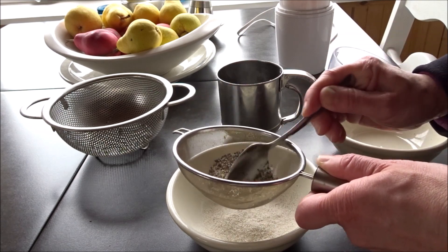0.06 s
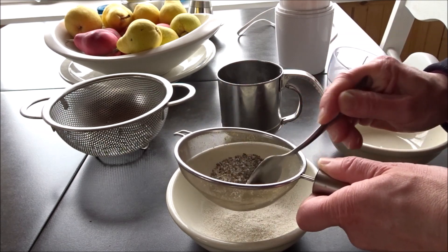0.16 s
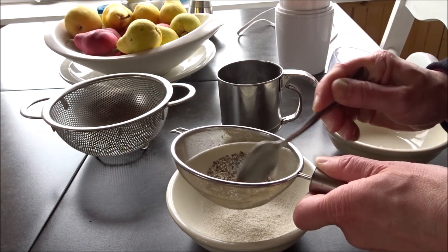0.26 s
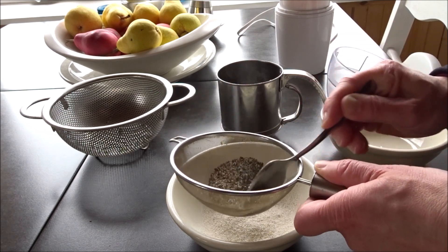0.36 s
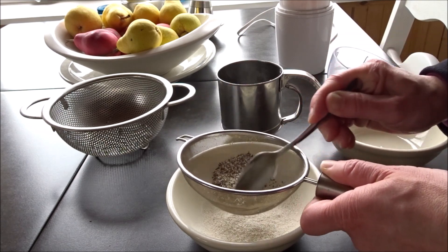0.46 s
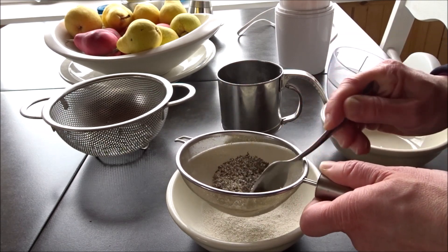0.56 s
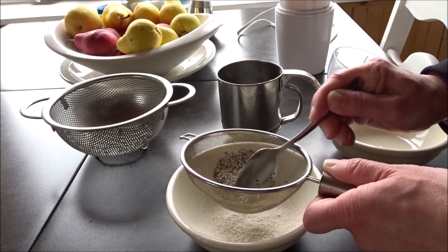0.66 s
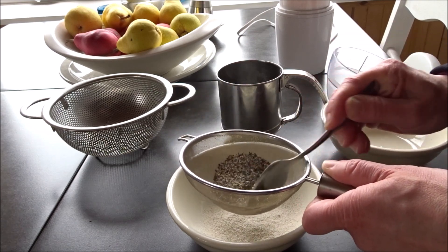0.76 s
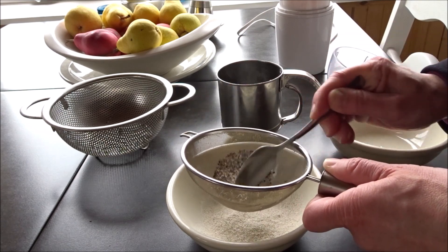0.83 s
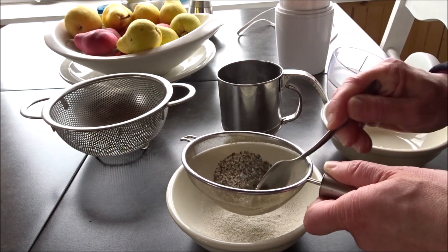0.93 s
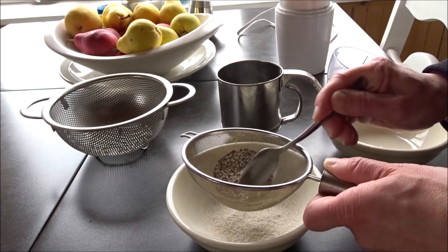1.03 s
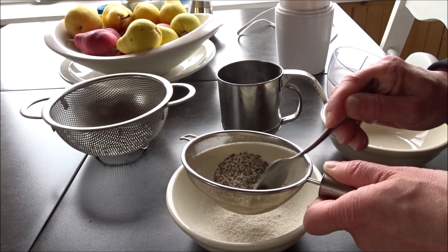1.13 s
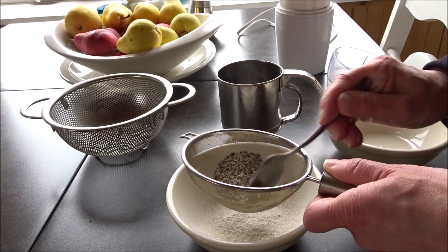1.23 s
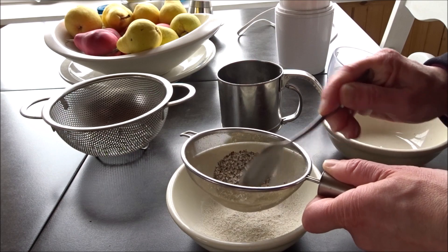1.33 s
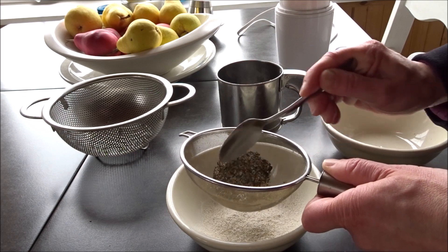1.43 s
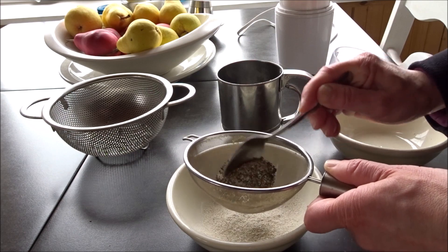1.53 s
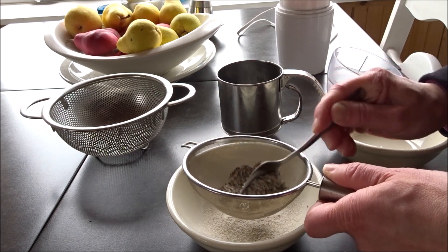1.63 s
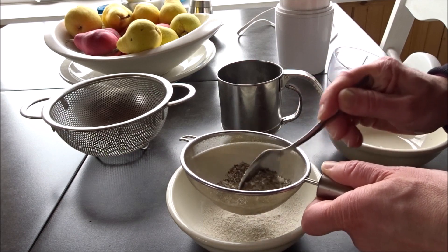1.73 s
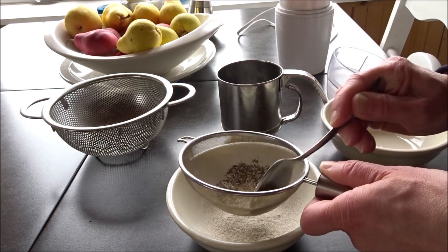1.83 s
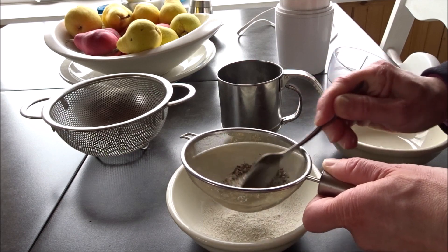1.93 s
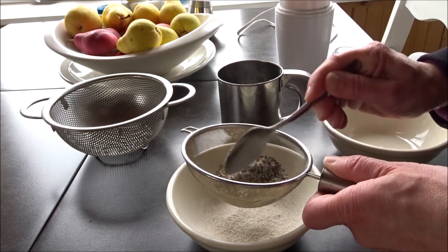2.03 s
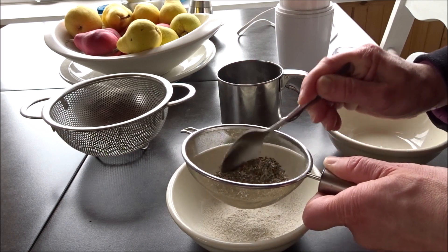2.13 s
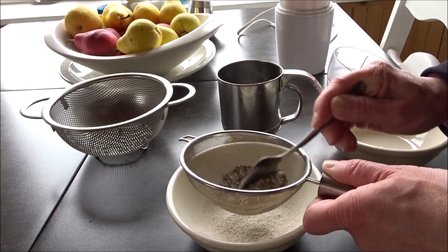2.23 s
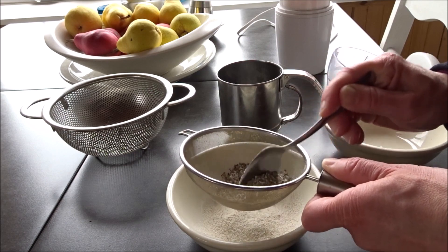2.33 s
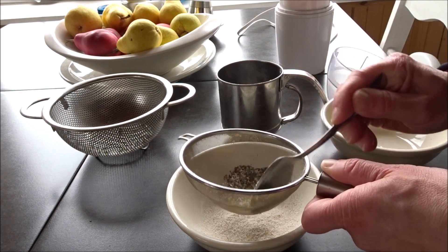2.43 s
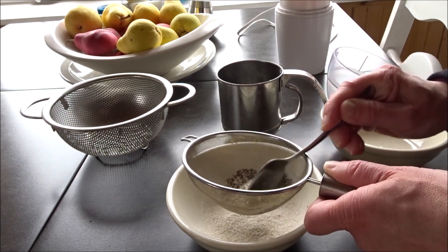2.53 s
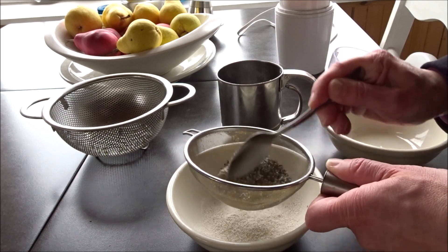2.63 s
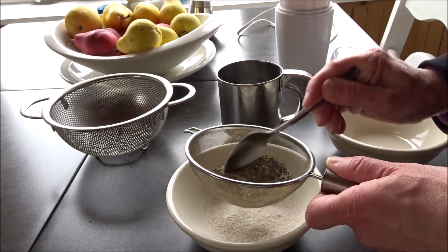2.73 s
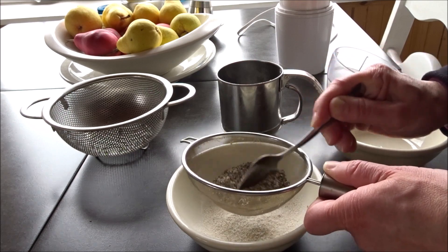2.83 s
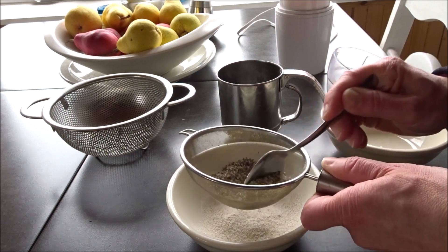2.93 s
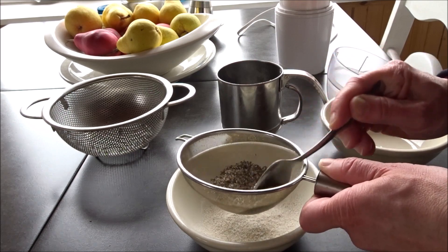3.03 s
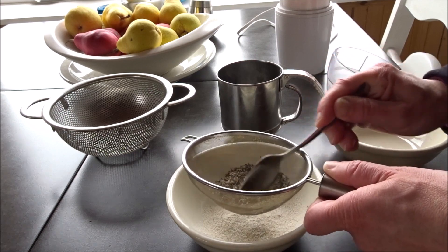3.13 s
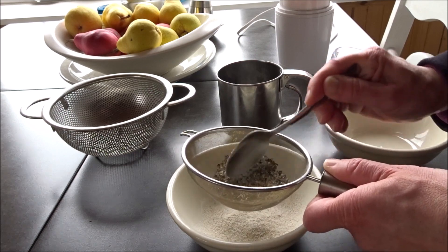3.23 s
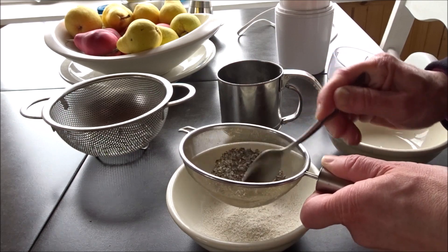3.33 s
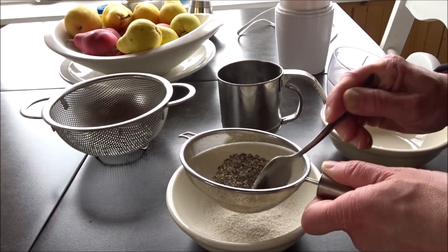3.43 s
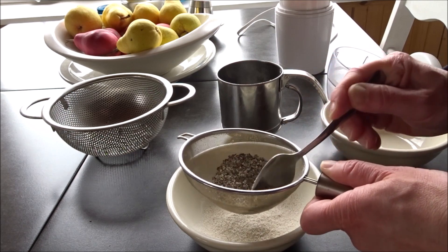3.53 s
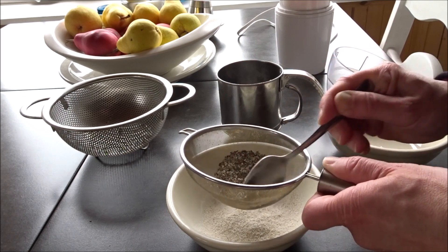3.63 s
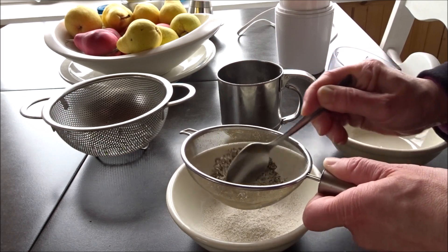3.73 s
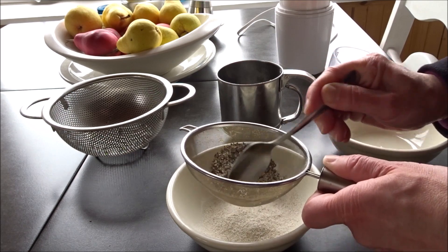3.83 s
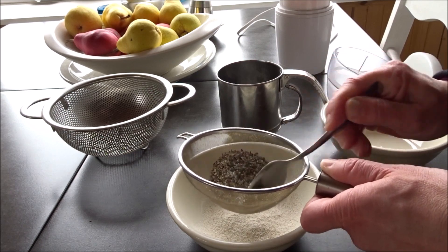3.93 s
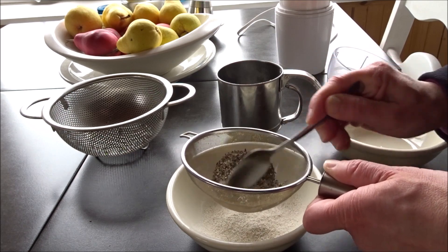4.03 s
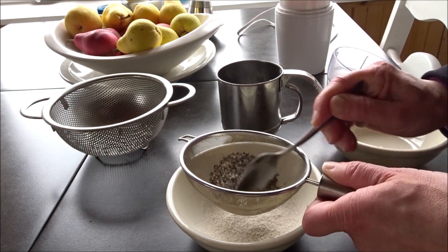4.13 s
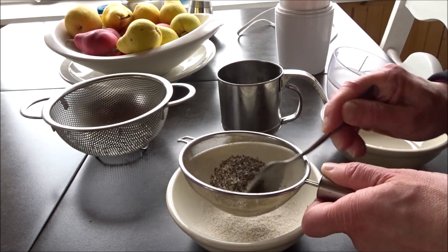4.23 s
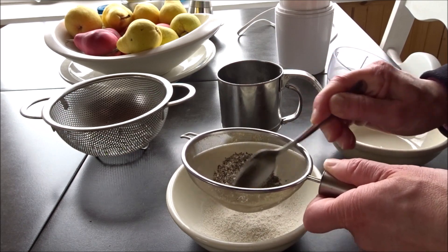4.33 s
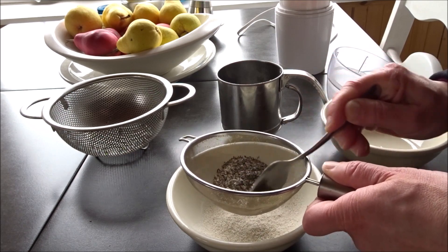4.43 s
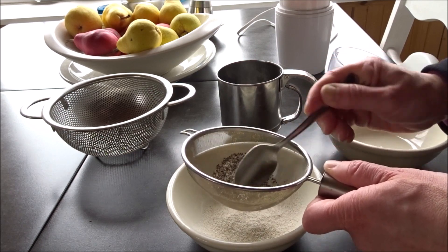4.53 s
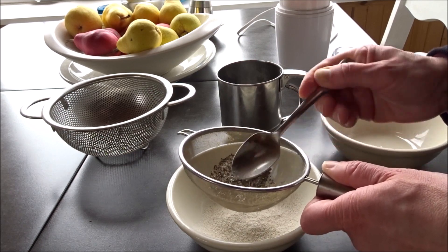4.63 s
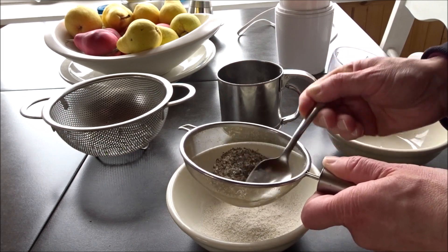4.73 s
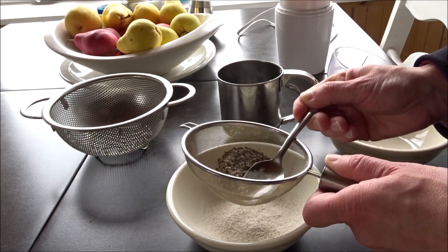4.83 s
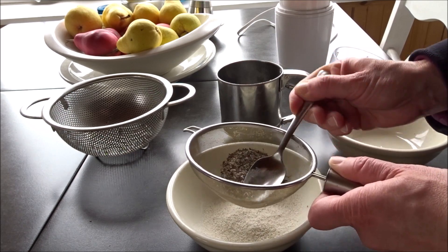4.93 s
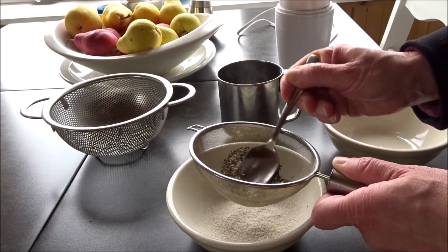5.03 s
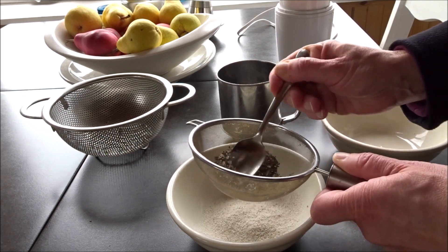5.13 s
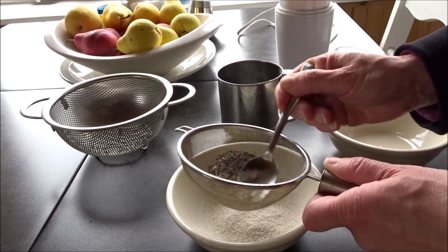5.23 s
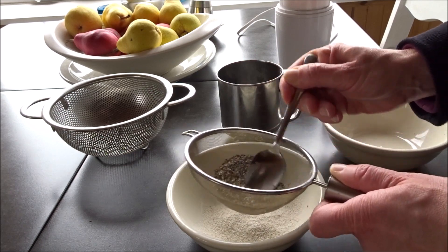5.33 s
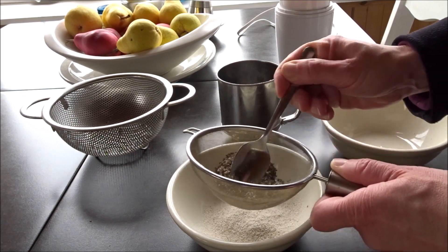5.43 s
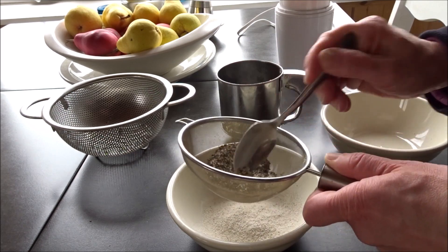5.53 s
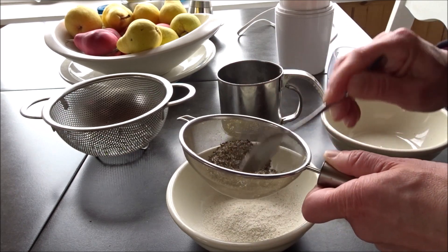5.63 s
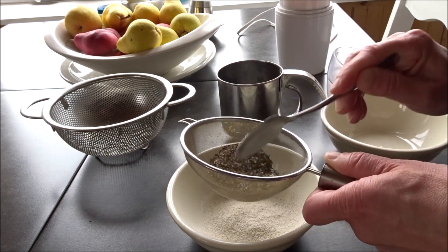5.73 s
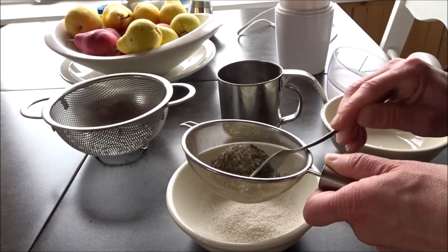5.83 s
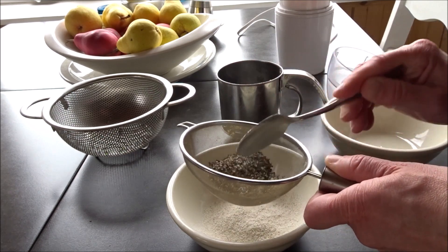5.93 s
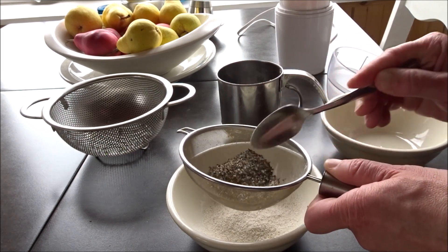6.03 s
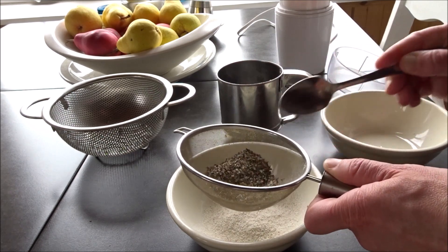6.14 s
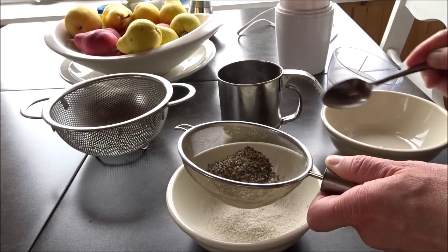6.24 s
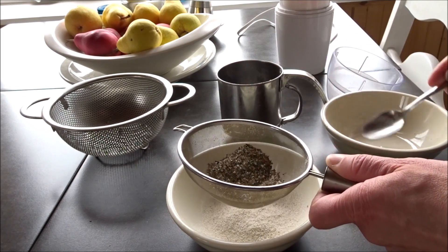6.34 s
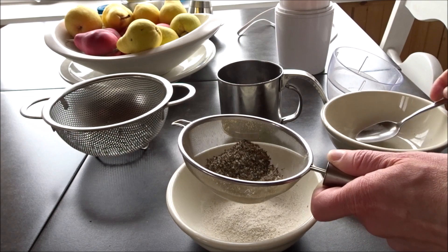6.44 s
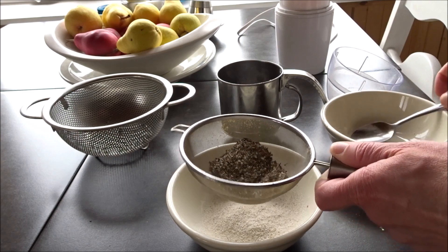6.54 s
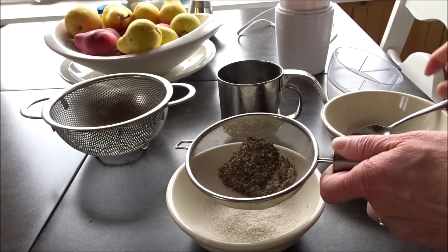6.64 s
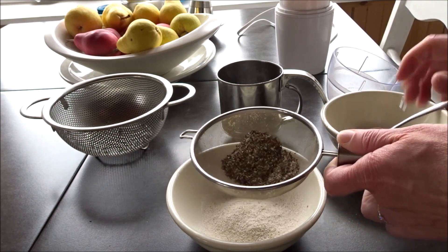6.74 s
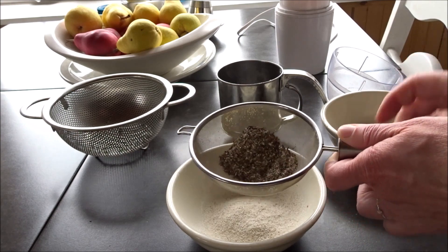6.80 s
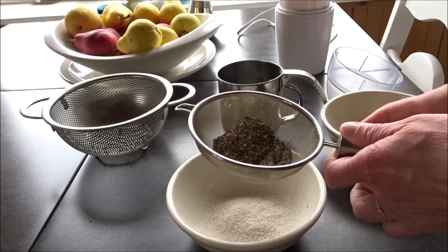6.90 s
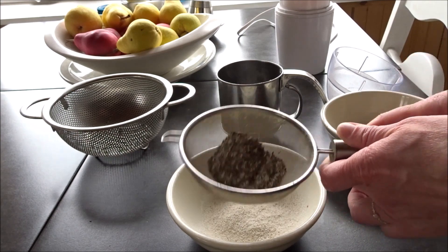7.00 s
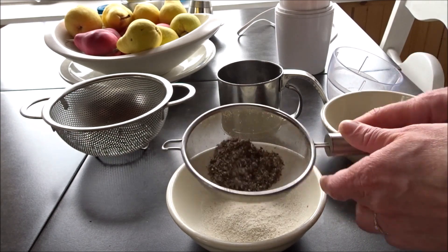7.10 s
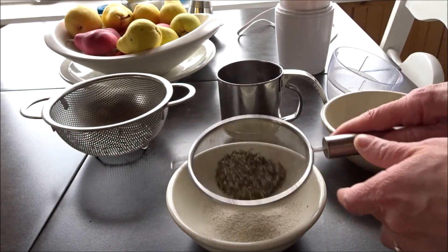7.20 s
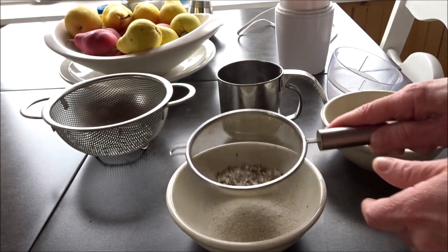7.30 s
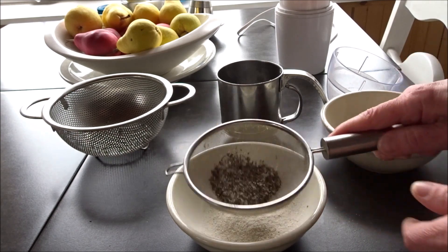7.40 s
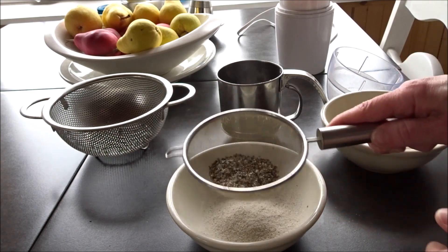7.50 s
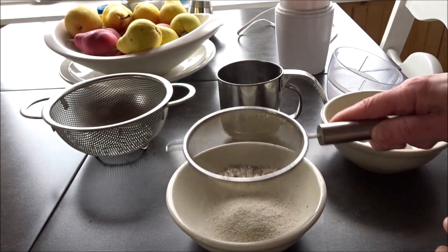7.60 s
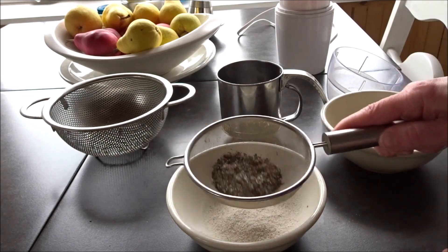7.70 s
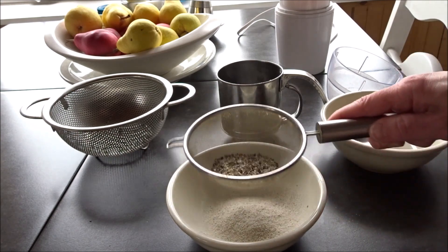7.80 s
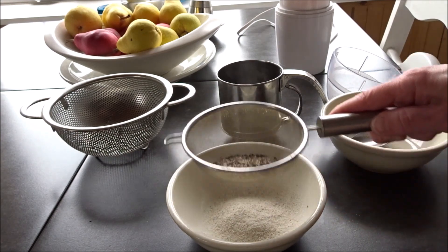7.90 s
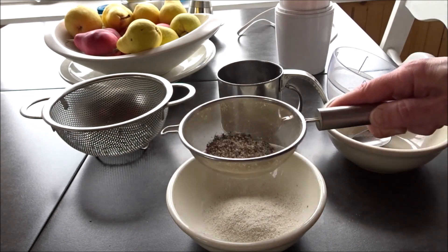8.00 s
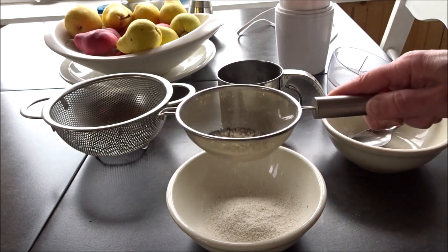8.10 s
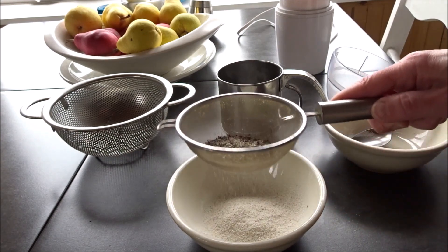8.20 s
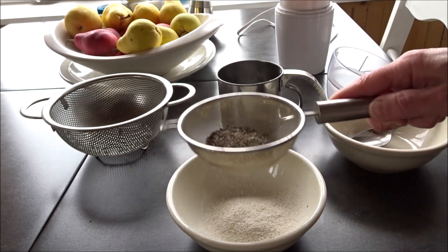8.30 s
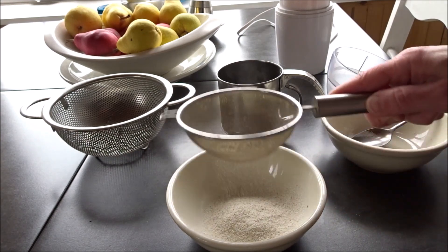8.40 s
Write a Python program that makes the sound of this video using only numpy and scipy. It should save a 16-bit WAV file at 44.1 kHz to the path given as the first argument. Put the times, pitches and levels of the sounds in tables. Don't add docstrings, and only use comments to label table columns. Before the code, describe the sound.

Close stereo microphones in a hard-walled kitchen hear a steel spoon rubbing coarse flour and bran over a fine wire sieve: quick, gritty, metallic strokes with small ticks, becoming sparser and lighter. The spoon knocks the rim, pauses, then drops into a glazed bowl with hard clacks and a fast, ringing rattle. Faint sifting shakes follow over a low room drone, while a distant vehicle accelerates outside.

```python
import sys
import numpy as np
from scipy import signal
from scipy.fft import rfft, irfft, next_fast_len
from scipy.io import wavfile
from scipy.ndimage import uniform_filter1d, map_coordinates

SR = 44100
rng = np.random.default_rng(int(sys.argv[2]) if len(sys.argv) > 2 else 0)


def bounce(signal):
    frames = np.transpose(np.atleast_2d(signal))
    limited = np.clip(frames, -1, 1)
    pcm = np.round(limited * 32767).astype(np.int16)
    wavfile.write(sys.argv[1], SR, pcm)


def decibels_to_gain(level_db):
    exponent = np.asarray(level_db, float) / 20
    return 10 ** exponent


N = 373150
TIME = np.arange(N) / SR
PORTS = np.array([[1], [-1]])

# freq_hz, width_hz, level_db
HELD_SPOON = [(1347, 170, -5), (2270, 160, -7), (3250, 220, 0.5), (4590, 160, 2.5), (5650, 330, -7.5),
              (7400, 64, -12), (8390, 160, 5), (10060, 350, -12), (2920, 136, -17), (1870, 190, -21)]
# freq_hz, level_db_per_hz
MESH_HISS = [(410, -73), (700, -9.5), (2540, -1), (3250, 2), (6790, 2), (8480, 0), (10600, -1), (11500, 1),
             (15000, -57.5), (22000, -120)]
# freq_hz, level_db_per_hz
AIR_HISS = [(60, -81), (200, -30), (1180, -18.5), (2000, -7), (4540, -6.5), (5260, -7.5), (10600, -11.5),
            (11300, -9), (11500, -42.5), (15000, -62.5), (22000, -120)]
# time_s, firing_hz, level_db
GEAR_PULLS = [
    [(4.9, 51.6, -90), (5.1, 50.88, -85), (5.4, 56.25, -85), (5.7, 60.15, -80), (6.05, 65.2, -81.5),
     (6.35, 72, -89)],
    [(6.8, 53.6, -80), (7.05, 57.6, -83.5), (7.3, 60.4, -82), (7.5, 63.7, -79), (7.7, 65.5, -79.5),
     (8.0, 71.5, -93)],
    [(8.05, 48.7, -96.5), (8.25, 51, -96.5), (8.46, 53.4, -90.5)],
]


def unit(x):
    return x / np.sqrt(np.mean(x ** 2) + 1e-20)


def along(points, hz):
    f, v = np.transpose(points)
    return np.interp(np.log(hz + 1), np.log(f + 1), v)


def wobble(rate):
    knots = rng.standard_normal(int(N * rate / SR) + 4)
    return map_coordinates(knots, [TIME * rate])


def filtered(x, response):
    m = next_fast_len(N + SR // 2)
    return irfft(rfft(x, m) * response(np.fft.rfftfreq(m, 1 / SR)), m)[..., :N]


def resonances(f, peaks):
    total = 0
    for k, (centre, width, db) in enumerate(peaks):
        damping = 1j * f * width
        total = total + (-1) ** k * decibels_to_gain(db) * damping / (centre * centre - f * f + damping)
    return total


def burst(spectrum, t60, tilt_db=0, attack=1e-4):
    size = 16384
    hz = np.fft.rfftfreq(size, 1 / SR)
    colour = decibels_to_gain(along(spectrum, hz) + tilt_db * (hz > 6500))
    x = irfft(rfft(rng.standard_normal(size)) * colour)
    t = TIME[:len(x)]
    x = x * decibels_to_gain(-60 * t / t60) * np.minimum(t / attack, 1)
    return x / np.abs(x).max()


def add(track, s, x):
    track[..., round(s * SR):][..., :x.shape[-1]] += x


def rush(spectrum, patchy_db):
    # freq_hz, left_right_likeness
    likeness = [(60, 0.75), (170, 0.89), (490, 0.88), (1410, 0.39), (4040, 0.02), (11600, 0.1)]
    z = signal.stft(rng.standard_normal((2, N)), nperseg=512)[2]
    field = uniform_filter1d(rng.standard_normal(z.shape[1:]), 6, 0)
    field = uniform_filter1d(field, 10, 1)
    pair = signal.istft(z * decibels_to_gain(patchy_db * unit(field)), nperseg=512)[1][:, :N]

    def mid_and_side(hz):
        angle = np.arccos(np.clip(along(likeness, hz), -1, 1)) / 2
        return decibels_to_gain(along(spectrum, hz)) * np.array([np.cos(angle), np.sin(angle)])

    mid, side = filtered(pair, mid_and_side)
    return unit(np.array([mid + side, mid - side]))


def related(pair, hz):
    # freq_hz, left_right_likeness
    room_likeness = [(60, 0.9), (220, 0.27), (830, 0.73), (3100, 0.32), (11600, -0.21)]
    alike = np.clip(along(room_likeness, hz), 0, .98)
    return np.array([pair[0], alike * pair[0] + np.sqrt(1 - alike ** 2) * pair[1]])


def walls(x, count):
    delay_s = rng.uniform(0.00033, .014, (count, 2, 1))
    sign = rng.choice([-1, 1], (count, 2, 1))

    def copies(f):
        total = sum(g * np.exp(-2j * np.pi * f * d) for d, g in zip(delay_s, sign))
        return related(total, f) / np.sqrt(count)

    return filtered(x, copies)


def kitchen(x, gap):
    # freq_hz, t60_s
    decay_times = [(300, 0.93), (2000, 0.65), (6000, 0.54), (11000, 0.37)]
    hz, t, z = signal.stft(rng.standard_normal((2, SR * 3 // 4)), SR, nperseg=256)
    fade = decibels_to_gain(-60 * t / along(decay_times, hz)[:, None])
    tail = signal.istft(related(z, hz[:, None]) * fade, SR, nperseg=256)[1]
    late = np.pad(np.atleast_2d(x).mean(0), (round(gap * SR), 0))[None]
    return signal.fftconvolve(late, tail / np.linalg.norm(tail[0]), axes=1)[:, :N]


def placed(x, pan_db, lag, early_db, wet_db):
    low_cut_hz = 360
    near = filtered(x, lambda f: 1 / (1 + (low_cut_hz / (f + 1)) ** 8))
    direct = filtered(near, lambda f: decibels_to_gain(pan_db / 2 * PORTS) * np.exp(-1j * np.pi * f * lag / SR * PORTS))
    return direct + decibels_to_gain(early_db) * walls(near, count=8) + decibels_to_gain(wet_db) * kitchen(near, gap=.006)


def background():
    # freq_hz, level_db_per_hz
    drone_colour = [(15, -76), (70, -42), (178, -21), (286, -9), (399, -8.5), (439, -2), (557, -7),
                    (706, -8), (1100, -13), (1430, -40.5), (2420, -120)]
    # freq_hz, level_db_per_hz
    road_colour = [(60, -80), (410, -35.5), (700, -5.5), (932, -3), (1040, -0.5), (1110, -2.5), (3200, -14),
                   (4160, -49), (7040, -120)]
    # time_s, level_db
    wash = [(0, -64), (1.2, -64.5), (2.8, -66), (4.5, -65), (5.3, -66), (7.1, -66), (7.55, -68),
            (8.03, -62.5), (8.46, -68)]
    # freq_hz, rms_db
    hum_tones = [
        (118.4, -99),
        (290.7, -83.5),
        (436.0, -77),
    ]
    s, _, engine_db = np.transpose(sum(GEAR_PULLS, []))
    rumble = np.hypot(decibels_to_gain(-67), decibels_to_gain(np.interp(TIME, s, engine_db) + 16))
    drone = rumble * decibels_to_gain(1.3 * wobble(6.1)) * rush(drone_colour, patchy_db=1.8)

    road_db = np.interp(TIME, *np.transpose(wash)) + 1.0 + 0.59 * wobble(7.6)
    road = decibels_to_gain(road_db) * rush(road_colour, patchy_db=0.5)

    air_db = -65.0 - 0.38 * TIME + 0.93 * wobble(5.3)
    air = decibels_to_gain(air_db) * rush(AIR_HISS, patchy_db=0.5)

    hum = np.zeros(N)
    for hz, db in hum_tones:
        level = decibels_to_gain(db + 3.5 + 2.5 * wobble(8.3))
        hum += level * np.sin(2 * np.pi * hz * TIME + 2.7 * wobble(6.4))
    return drone + road + air + hum + vehicle()


def strokes():
    # start_s, length_s, level_db, lean_db (edge -, belly +)
    pushes = [(.046, 0.049, -43, 9), (.131, 0.045, -42, -4), (.332, 0.03, -54.5, -17),
              (.404, 0.08, -45, -19), (.627, 0.052, -39, -7), (.825, 0.045, -39.5, -5),
              (1.024, 0.035, -39.5, 7), (1.189, 0.041, -43.5, 1), (1.548, 0.076, -52.5, 5),
              (1.919, 0.069, -46.5, -11), (2.222, 0.081, -45.5, 6.5), (2.457, 0.037, -61, 1),
              (2.527, 0.086, -45, -5), (2.759, .045, -62, 0), (3.088, 0.08, -48, -11),
              (3.635, 0.028, -50.5, 0), (3.673, 0.11, -46, 11), (3.871, 0.055, -50.5, 4),
              (4.037, 0.063, -43, 0), (4.22, 0.019, -47.5, 3), (4.279, 0.056, -40, 5.5),
              (4.482, 0.05, -41.5, 0), (5.292, 0.12, -57.5, -4), (5.461, .016, -56, 0)]
    # start_s, length_s, level_db, lean_db
    pulls = [(.508, 0.057, -46.5, -2), (.72, 0.036, -37, -1), (.904, 0.058, -43.5, 0),
             (1.08, 0.048, -40.5, -3), (1.255, 0.05, -46.5, 3), (1.492, 0.022, -61, 28),
             (1.641, 0.034, -46, -6), (2.17, 0.028, -64, 4), (2.543, 0.03, -54, -18),
             (2.842, 0.066, -46.5, -2), (3.164, 0.055, -48.5, -1), (3.359, 0.09, -57, -7),
             (3.924, 0.045, -51, 13), (4.158, 0.071, -46, 1), (4.377, 0.054, -44, 7),
             (4.765, 0.061, -61.5, 9), (4.831, 0.046, -53.5, 11), (4.932, 0.025, -46.5, -5.5),
             (4.981, 0.091, -58, -5), (5.213, 0.052, -54.5, 20)]
    power, lean = np.zeros((3, N)), []
    for table, rise_share, treble_db in ((pushes, 0.65, -6.5), (pulls, 0.26, -6)):
        for s, length, db, lean_db in table:
            rise = rise_share * length
            near = slice(max(round((s - length) * SR), 0), round((s + 3 * length) * SR))
            t = TIME[near] - s - rise
            rising = (np.abs(t) / (0.88 * rise)) ** 1.46
            falling = (np.abs(t) / (1.03 * (length - rise))) ** 1.35
            drop_db = 9.36 * np.where(t < 0, rising, falling)
            light_db = -40 - db
            low_db = -11.5 + 0.23 * lean_db + 0.23 * light_db
            high_db = treble_db + 0.16 * light_db
            zones_db = np.array([[low_db], [-4], [high_db]])
            power[:, near] += decibels_to_gain(2 * (db - drop_db + zones_db))
            lean.append((s + rise, lean_db, light_db))
    s, lean_db, light_db = np.transpose(sorted(lean))
    return power, np.interp(TIME, s, lean_db), np.interp(TIME, s, light_db)


def rubbing():
    power, lean_db, light_db = strokes()
    chance, size = rng.random((2, N))
    grain = decibels_to_gain(np.minimum(-4.2 * np.log(size), 13)) * rng.standard_normal(N)
    grit = (chance < 5000 / SR) * grain
    drive = unit(grit) + 0.66 * rng.standard_normal(N)
    drive = drive * decibels_to_gain(2.3 * wobble(80) + 1.62 * wobble(300))
    gains_db = 5.3 * np.array([wobble(21.96) for _ in HELD_SPOON])
    gains_db[2:5] += np.outer([0.45, 0.17, -0.91], lean_db)
    gains_db[8] -= 0.43 * lean_db
    gains_db -= 0.3 * np.clip(light_db, 0, 20)
    body = decibels_to_gain(1.2 * wobble(24.8)) * filtered(drive, lambda f: 0.48 * decibels_to_gain(along(MESH_HISS, f)))
    for db, peak in zip(gains_db, HELD_SPOON):
        body += decibels_to_gain(db) * filtered(drive, lambda f: resonances(f, [peak]))
    zones = filtered(body, lambda f: np.array([f < 2600, (f >= 2600) & (f < 6500), f >= 6500]))
    return sum(np.sqrt(p) * unit(z) for p, z in zip(power, zones))


def ticks():
    # freq_hz, level_db_per_hz
    tick_colour = [(300, -50), (900, -20), (2800, -4), (4000, -15), (5500, 2.5), (7000, -8), (8500, -10.5),
                   (11000, -6), (13000, -35)]
    # time_s, peak_db
    snaps = [(0.408, -25), (0.677, -27), (.7272, -40), (.9088, -30), (1.087, -31), (1.6522, -30),
             (2.5468, -24.5), (2.58, -26.5), (2.8577, -29.5), (3.0987, -26.5), (3.781, -29.5), (4.229, -26),
             (4.3875, -26.5), (4.9217, -40), (5.468, -32.5)]
    # time_s, peak_db
    bumps = [(0.1342, -29), (0.3514, -43), (.5113, -37), (0.6188, -36), (.634, -37), (1.2585, -31),
             (1.9388, -26.5), (1.956, -25), (2.2348, -27), (2.4743, -42.5), (3.649, -32), (3.8968, -31.5),
             (4.1698, -32.5), (4.2901, -35), (4.453, -29), (4.479, -33), (4.9374, -38), (5.22, -49),
             (5.2969, -40)]
    # time_s, peak_db
    cracks = [(.0553, -43), (0.443, -39), (.835, -41), (1.019, -39), (1.038, -38), (1.5748, -44),
              (1.9975, -37), (2.221, -33), (2.2724, -29), (2.498, -41), (2.567, -34), (2.586, -26.5),
              (2.596, -35), (2.8137, -46), (2.887, -34), (2.904, -42), (3.0829, -42), (3.1275, -44),
              (3.142, -36), (3.175, -44), (3.215, -42), (3.3712, -48), (3.455, -40), (3.7105, -40),
              (3.932, -43), (4.0277, -49), (4.0527, -39), (4.886, -42), (4.9418, -30), (4.9465, -40),
              (4.9921, -39), (5.312, -40), (5.695, -44)]
    x = np.zeros(N)
    for table, treble_db in ((snaps, 5.5), (bumps, 1.5)):
        for s, db in table:
            add(x, s, decibels_to_gain(db - 6.0) * burst(tick_colour, t60=0.015, tilt_db=treble_db))
            add(x, s, decibels_to_gain(db - 25.0) * burst(MESH_HISS, t60=0.042))
    for s, db in cracks:
        add(x, s, decibels_to_gain(db - 4) * burst(MESH_HISS, t60=0.0033))
    return x + 0.89 * filtered(x, lambda f: resonances(f, HELD_SPOON))


def handling():
    # time_s, peak_db
    thumps = [
        (.39, -82),
        (1.925, -78),
        (2.226, -85),
        (2.54, -86),
        (2.843, -91),
        (3.617, -86),
        (4.264, -79),
        (4.443, -77),
    ]
    # time_s, level_db
    shakes = [
        (7.307, -65),
        (7.402, -63),
        (7.481, -65.5),
        (7.548, -66),
        (7.704, -63),
        (7.79, -67),
        (7.864, -63.5),
    ]
    bran_slide = [(100, -80), (1500, -30.5), (4000, -1), (8000, 0), (11000, -1.0)]  # freq_hz, level_db_per_hz
    jolts, slide = np.zeros((2, N))
    for s, db in thumps:
        t = TIME - s
        jolts += decibels_to_gain(db) * np.exp(-(t / 0.0089) ** 2) * np.sin(2 * np.pi * 65 * t)
    for s, db in shakes:
        slide += decibels_to_gain(db) * np.exp(-((TIME - s) / 0.027) ** 2)
    return jolts + slide * rush(bran_slide, patchy_db=2.0)


def taps():
    # time_s, peak_db, treble_db, spoon_ring_db
    knocks = [
        (4.8356, -29, 7, 5),
        (4.857, -40, -4, 8),
        (5.8456, -49, 3, -20),
        (5.8689, -21.5, -1, -18),
    ]
    # freq_hz, width_hz, level_db
    thud_peaks = [(1350, 600, -12), (2790, 750, -4), (4070, 600, -13.5), (4950, 420, -0.5),
                  (5540, 520, -0.5), (6900, 1100, -6.5), (8460, 500, -9.5), (10000, 1000, -13)]
    # freq_hz, width_hz, level_db
    rim_peaks = [(2760, 230, -1), (5486, 230, -16), (8550, 270, -2), (1403, 200, -9)]
    # freq_hz, level_db_per_hz
    bran_colour = [(600, -40.5), (1300, -13), (2400, -2.5), (3700, -5), (6300, -2), (8500, -8),
                   (11000, -13), (22000, -120)]
    hz = np.fft.rfftfreq(4096, 1 / SR)
    crack, rung = np.zeros((2, N))
    for s, db, treble_db, ring_db in knocks:
        spectrum = 0
        for centre, width, level in thud_peaks:
            gain = decibels_to_gain(level + treble_db * (centre > 7500))
            spectrum = spectrum + gain * resonances(hz, [(centre, width, 0)]) ** 2
        thud = irfft(spectrum)
        blow = decibels_to_gain(db) * thud / np.abs(thud).max()
        add(crack, s, blow)
        add(crack, s, decibels_to_gain(db - 13) * burst(bran_colour, t60=.03))
        add(crack, s, decibels_to_gain(db - 19) * burst(bran_colour, t60=.3, attack=0.0035))
        add(rung, s, decibels_to_gain(ring_db) * blow)
    return crack + filtered(rung, lambda f: resonances(f, rim_peaks))


def vehicle():
    # multiple_of_firing, level_db
    firing_orders = [(1, -8), (2, -1.5), (3, 5.5), (4, 6.5), (5, -10), (6, -5.5), (8, 2.5)]
    # freq_hz, level_db
    wall_modes = [(50, -13), (65, 1), (90, -15), (120, 2.5), (138, -3.5), (155, 3.5), (175, -10.5),
                  (200, 1), (222, -12), (250, 0), (300, 8)]
    x = np.zeros(N)
    for gear in GEAR_PULLS:
        s, hz, db = np.transpose(gear)
        firing_hz = np.interp(TIME, s, hz)
        turns = np.cumsum(firing_hz * (1 + 0.0028 * wobble(6.3))) / SR
        fade = np.clip(np.minimum(TIME - s[0], s[-1] - TIME) / 0.12, 0, 1)
        orders = np.zeros(N)
        for k, level in firing_orders:
            order_db = level + along(wall_modes, k * firing_hz) + 2.8 * wobble(3.224) + 2.8 * wobble(19)
            orders += decibels_to_gain(order_db) * np.sin(2 * np.pi * k * turns + 0.9 * wobble(12))
        x += fade * decibels_to_gain(np.interp(TIME, s, db)) * orders
    return x


def landing():
    # time_s, peak_db
    touches = [
        (6.3993, -14),
        (6.4013, -15),
        (6.4175, -18),
        (6.434, -20),
        (6.456, -27),
        (6.487, -29.5),
    ]
    # freq_hz, level_db_per_hz
    clack_colour = [(150, -63.5), (250, -36.5), (675, -13.5), (4920, -6), (6780, -9), (10600, -4.5),
                    (11500, -13), (15000, -41.5), (22000, -120)]
    # freq_hz, width_hz, level_db
    skid_peaks = [(615, 280, -5.5), (1090, 84, -5), (1666, 120, -2), (2250, 190, -4), (4430, 250, -6.5),
                  (5000, 70, -5), (8300, 34, -6), (10320, 55, -7), (10880, 56, -2)]
    clacks, skid = np.zeros((2, N))
    for s, db in touches:
        add(clacks, s, decibels_to_gain(db - 2.0) * burst(clack_colour, t60=0.0099))
        add(skid, s, decibels_to_gain(db + 8.5) * burst(clack_colour, t60=.006))
        add(clacks, s, decibels_to_gain(db - 21) * burst(clack_colour, t60=0.2))
        add(skid, s, decibels_to_gain(db + 5.0) * burst(AIR_HISS, t60=0.25, tilt_db=12))
    return clacks + filtered(skid, lambda f: resonances(f, skid_peaks))


def ring(modes, scatter_db, turn):
    t = TIME[:SR // 2]
    total = np.zeros((2, len(t)))
    for hz, db, t60 in modes:
        a, b, c, d = rng.standard_normal(4)
        level = decibels_to_gain(db + scatter_db * (a + PORTS * b / 2) - 60 * t / t60)
        phase = 9 * c + PORTS * turn * d * hz / 6000
        total += level * np.sin(2 * np.pi * hz * t + phase)
    return total * (1 - np.exp(-t / 0.0006))


def rattle():
    # time_s, crack_db, ring_db, rocking_db (middle modes +, upper -), lowest_modes_db
    bounces = [(6.573, -5, -25.5, -5.5, -22.5), (6.5954, -8.5, -23.5, 2, -24.5),
               (6.615, -12, -31, 1.5, -31), (6.6216, -6, -23, -6.5, -34), (6.6404, -5.5, -22.5, 5, -29.5),
               (6.6554, -19, -27, -3, -28), (6.6742, -6, -23, 7.5, -27), (6.6904, -15.5, -21.5, 2, -36.5),
               (6.6998, -10, -25, -7, -31.5), (6.7114, -14, -25.5, -1.5, -38),
               (6.7204, -14, -26, -0.5, -27), (6.7334, -16.5, -25.5, 3.5, -34.5),
               (6.765, -23, -36.5, 0.5, -39.5)]
    spoon_rings = [-25, -28.5, -38, -35.5, -29.5, -37, -36, -36, -33.5, -33, -37, -41.5, -50]
    # freq_hz, level_db, t60_s
    bowl_modes = [
        [(1701, 0, .36), (1723, -9, .3), (1082, -17, .15)],
        [(3488, 0, .3), (3532, -8, .3), (3591, -11, .26), (3461, -11, .3)],
        [(5760, 0, .36), (5730, -8, .36), (6322, -13, .33), (6373, -14, .3), (6813, -19, .2)],
        [(8597, 0, .22), (8485, -3, .2), (8637, -6, .22), (8682, -6, .2), (10455, -7, .22), (10797, -7, .22)],
    ]
    # freq_hz, level_db, t60_s
    free_spoon = [(5067, 3, .1), (4881, -4, .12), (2290, -9, .15)]
    # freq_hz, level_db_per_hz
    knock_colour = [(150, -60.5), (250, -24.5), (2200, -20.5), (2950, -11), (4300, -14), (6900, -22),
                    (11500, -20), (22000, -120)]
    # freq_hz, level_db_per_hz
    buzz_colour = [(150, -61), (250, -22.5), (3510, -15.5), (4540, -21), (8760, -19.5), (11500, -15.5),
                   (22000, -120)]
    # freq_hz, left_minus_right_db, left_lead_rad
    beams = [(1700, -0.5, .6), (3490, 0.5, .3), (5070, -7, -0.15), (5760, -6, -0.98), (8600, -3.5, -.9),
             (10600, 0, -.8)]
    x, buzz = np.zeros((2, 2, N))
    times = np.array(bounces)[:, 0]
    for (s, crack_db, ring_db, rock_db, low_db), spoon_db in zip(bounces, spoon_rings):
        top_db = ring_db + 2.5 - 33 * (s - times[0])
        levels_db = [low_db, ring_db + rock_db, ring_db - rock_db, top_db, spoon_db]
        tone = 0
        for db, modes in zip(levels_db, bowl_modes + [free_spoon]):
            tone = tone + decibels_to_gain(db - 0.5) * ring(modes, scatter_db=1.0, turn=.25)
        later_bounces = np.searchsorted(times, s + TIME[:SR // 2]) - np.searchsorted(times, s, "right")
        add(x, s, tone * .35 ** np.maximum(later_bounces, 0))
        add(x, s, decibels_to_gain(crack_db - 9.5) * burst(knock_colour, t60=0.007, attack=0.00046))
        sides = 0.55 * PORTS * burst(AIR_HISS, t60=0.24, attack=.002)
        loose = burst(buzz_colour, t60=0.27, attack=.002) + sides
        add(buzz, s, decibels_to_gain(crack_db / 2 - 20) * loose)

    def beam(f, column):
        return along(np.array(beams)[:, [0, column]], f) * PORTS / 2

    chatter = buzz * decibels_to_gain(2.5 * wobble(220))
    return filtered(x + chatter, lambda f: decibels_to_gain(beam(f, 1)) * np.exp(1j * beam(f, 2)))


def scene():
    sieve = placed(rubbing() + ticks(), pan_db=-2.0, lag=1.0, early_db=-16, wet_db=-11.0)
    rim = placed(taps(), pan_db=-5.0, lag=0.93, early_db=-10, wet_db=-12.5)
    drop = placed(landing(), pan_db=-2.0, lag=1.6, early_db=-3.5, wet_db=0.0)
    bowl = placed(rattle(), pan_db=0.0, lag=.6, early_db=-13.5, wet_db=-13.0)
    return background() + sieve + handling() + rim + drop + bowl


def top_cut(x):
    return signal.sosfilt(signal.butter(12, 12170, fs=SR, output="sos"), x)


def record(dry):
    # freq_hz, left_minus_right_db
    pair_colour = [(60, 2.5), (170, -1), (490, 0), (1410, -3.5), (4040, -2), (11600, -2.5)]
    top_hz = 10985

    def microphones(f):
        return decibels_to_gain(along(pair_colour, f) * PORTS / 2) / (1 + (f / top_hz) ** 400)

    return top_cut(filtered(dry, microphones))


dry = scene()
out = record(dry)
bounce(out)
```